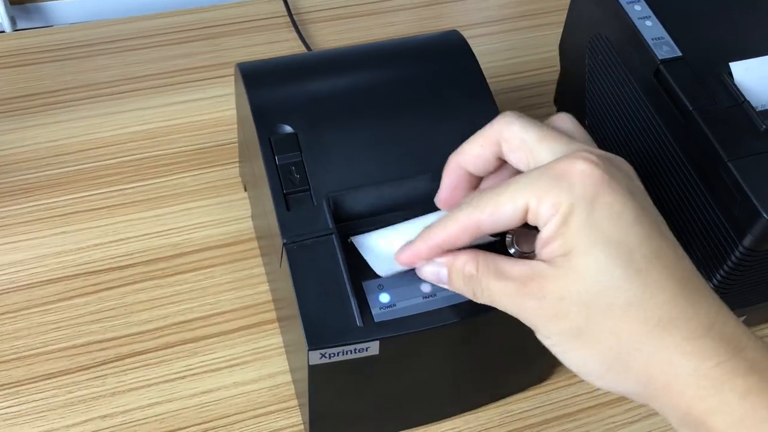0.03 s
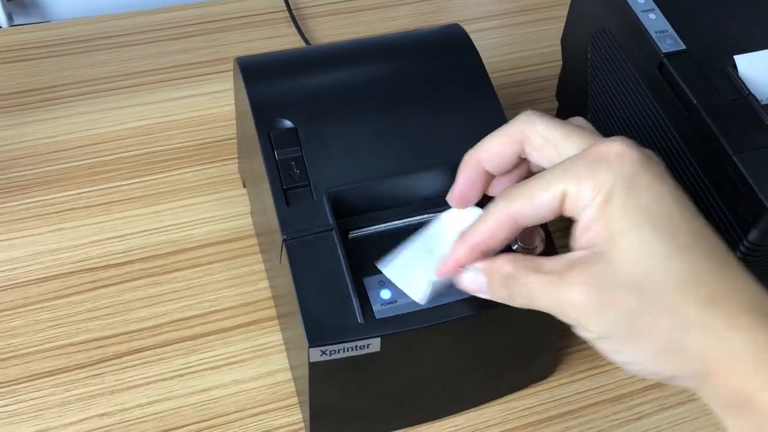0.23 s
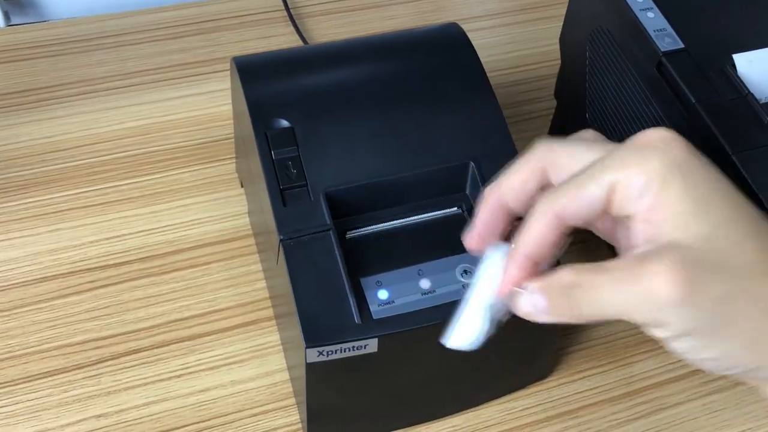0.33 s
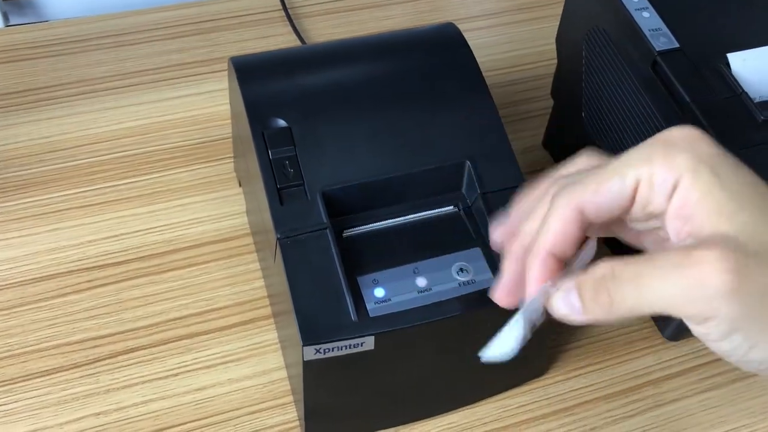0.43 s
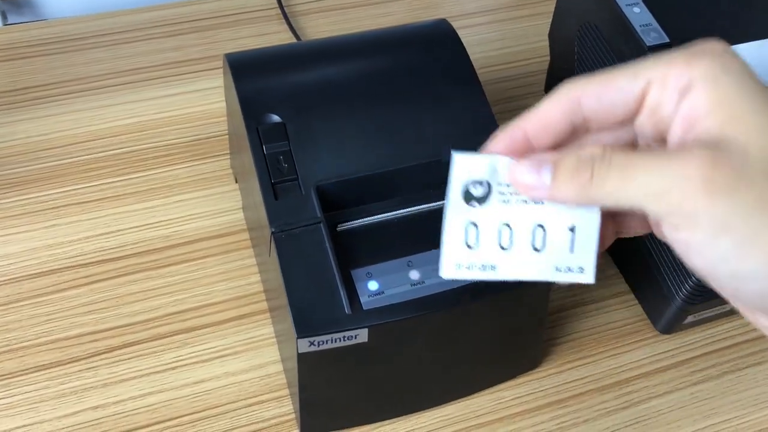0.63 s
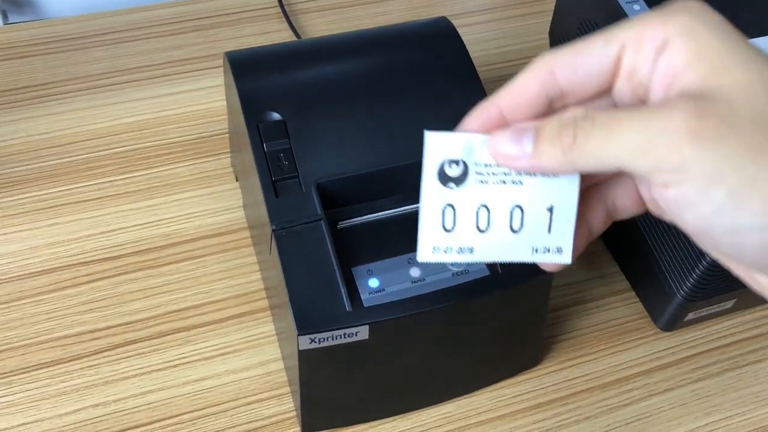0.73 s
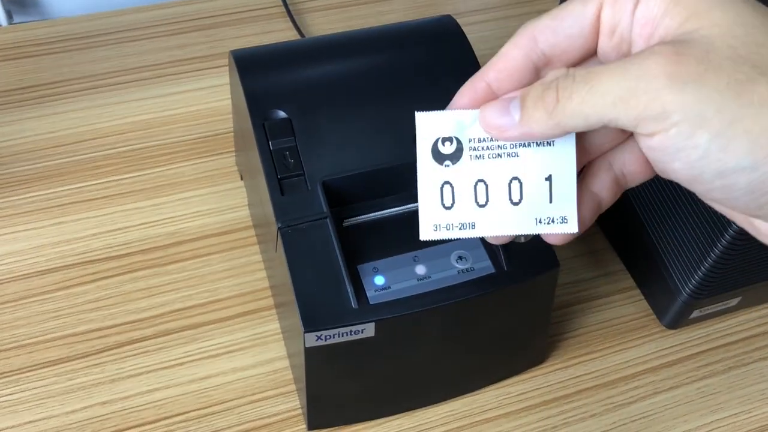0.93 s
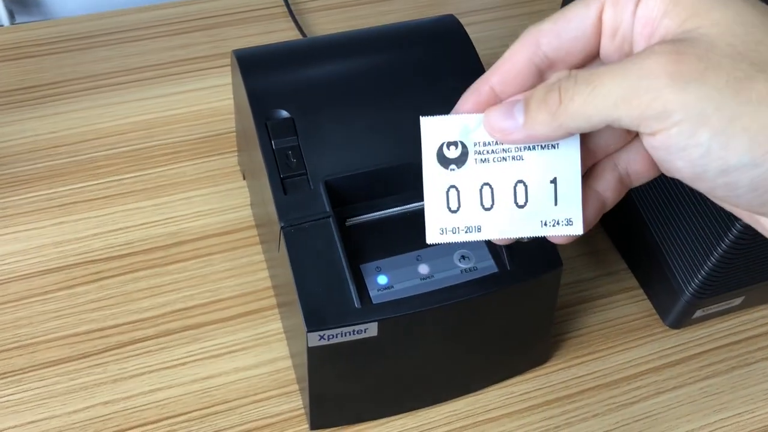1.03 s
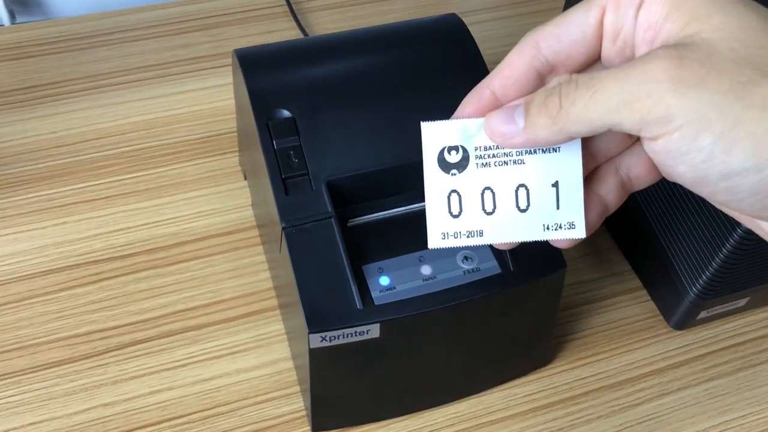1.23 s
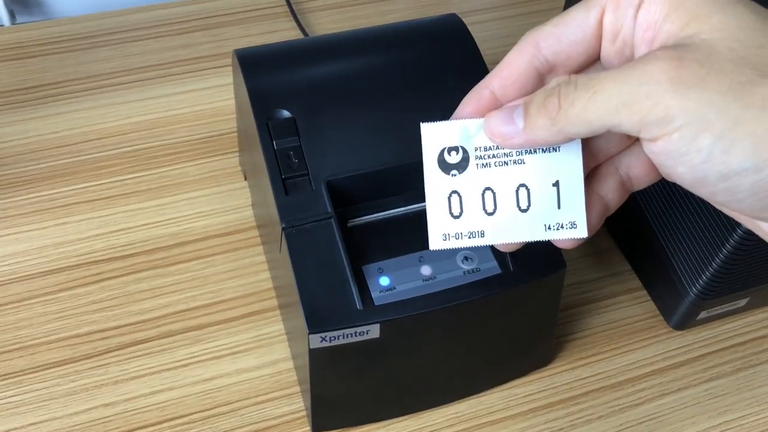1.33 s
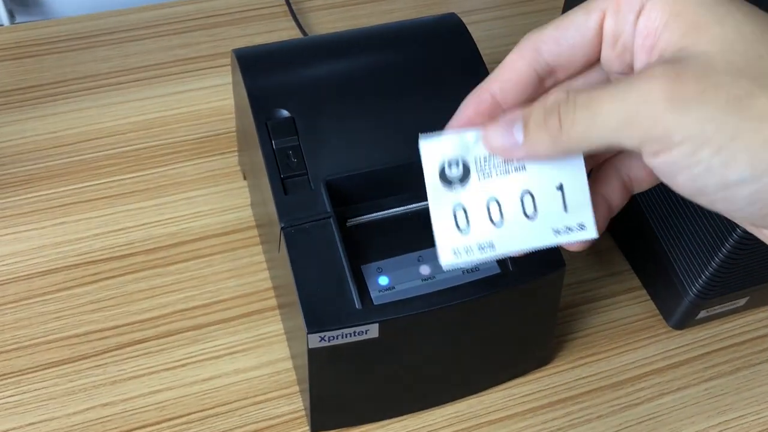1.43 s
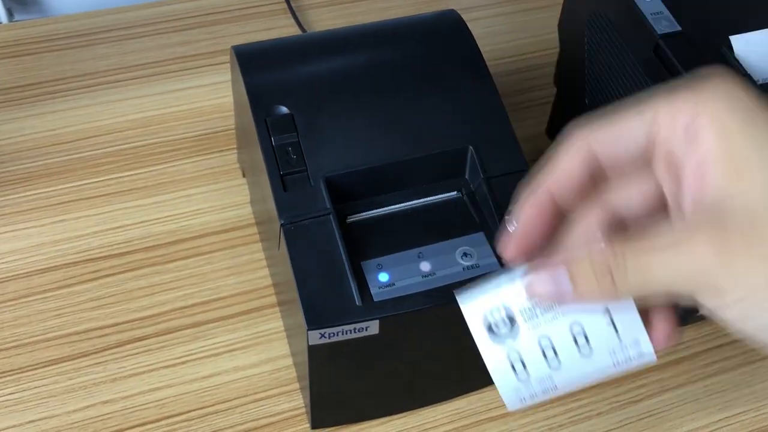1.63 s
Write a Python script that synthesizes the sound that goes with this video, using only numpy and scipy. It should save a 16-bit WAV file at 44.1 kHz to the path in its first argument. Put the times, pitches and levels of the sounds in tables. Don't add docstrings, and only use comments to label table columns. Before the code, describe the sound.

A small paper ticket is torn along a printer's toothed edge in a fast, crisp rip ending in a loud snap, then faint ticks and rustling between fingers, close to a phone in a quiet, lightly echoing office.

```python
import sys
import numpy as np
from scipy import signal
from scipy.fft import rfft, irfft
from scipy.io import wavfile
from scipy.ndimage import uniform_filter1d

SR = 44100
rng = np.random.default_rng(int(sys.argv[2]) if len(sys.argv) > 2 else 0)


def level_to_linear(level):
    exponent = np.asarray(level, float) / 20
    return 10 ** exponent


def to_wav(sig):
    pcm = np.clip(np.atleast_2d(sig), -1, 1) * 32767
    pcm = np.round(pcm).astype(np.int16)
    wavfile.write(sys.argv[1], SR, pcm.T)


N = 74970
T = np.arange(N) / SR

# f/Hz, density/dB
AIR_SPECTRUM = [(25, -28), (45, -5), (100, -6), (250, -14.5), (700, -14), (1800, -21), (3500, -31),
                (15000, -47.5)]
# f/Hz, width/Hz, level/dB
FAN_HUMS = [(44.7, 17, -65), (91.6, 32.6, -58.5), (188.8, 59.4, -54.5), (290.7, 95, -62.5)]
# f/Hz, T60/s
ROOM_T60 = [(300, 0.91), (1500, 1), (4000, 0.91), (8000, 0.45), (12000, 0.18), (16000, 0.44)]
# f/Hz, density/dB
SKIN_SPECTRUM = [(1500, -30.5), (2500, -12.5), (3300, 1.5), (4200, -5.5), (5600, -1), (7000, -3.5),
                 (9000, -4.5), (16000, -13.5)]
# f/Hz, width/Hz, level/dB, t favoured/s
SKIN_MODES = [(3330, 440, 1, 1.585), (5350, 600, -2, 1.655), (5600, 280, -1, 1.545), (6860, 350, 4, 1.6),
              (8060, 370, -3, 1.575), (10500, 350, 2, 1.545), (15230, 500, -3, 1.55)]
# f/Hz, width/Hz, level/dB
SLEEVE_MODES = [(5500, 2600, 0.5), (7160, 1700, 1), (10500, 2800, -0.5), (14500, 1000, -3),
                (15600, 600, -11.5)]
# t/s, level/dB
SLIDE_LEVEL = [(1.52, -74), (1.538, -53), (1.6, -54), (1.62, -59.5), (1.65, -54.5), (1.667, -54),
               (1.672, -63), (1.7, -67)]
# t/s, level/dB
RUSTLE_LEVEL = [(0, -69), (.15, -66), (.45, -53), (.58, -63.5), (.65, -58.5), (.69, -64), (.72, -63),
                (.8, -64), (.9, -73.5), (1.02, -73), (1.1, -67), (1.2, -70), (1.3, -78), (1.4, -69),
                (1.5, -67), (1.7, -72)]
# t/s, peak/dB, f/Hz, length/ms
TICKS = [
    (.5708, -40, 12280, .7),
    (.6193, -45, 8000, .7),
    (.7215, -50.5, 5500, 4.1),
    (1.6500, -46.5, 5300, 12),
    (1.6600, -50, 10930, 2.4),
    (1.6610, -52, 14500, 2.5),
]
# t/s, peak/dB, f/Hz, decay/ms
KNOCKS = [(.1585, -44.5, 4300, 2.5), (0.189, -40, 1530, 3.8), (.2011, -15, 11500, .15),
          (.3562, -11, 9500, .2), (.3600, -14, 11000, .2), (.3707, -8, 7500, .15), (.3723, -7, 9500, 0.17),
          (.2020, -36, 472, 4.3), (0.201, -38, 1300, 3.4), (.2185, -31, 650, 5.7), (.2385, -35, 700, 5.3),
          (.2830, -33, 690, 6), (.2190, -37.5, 1795, 5), (0.2198, -44, 1480, 5), (.2385, -31, 552, 7.5),
          (0.24, -33, 1290, 4.4), (.2390, -36.5, 2150, 5), (.3735, -29.5, 2050, 2.6),
          (.3750, -26.5, 1705, 4.6), (.3750, -29, 1226, 4), (.5715, -37.5, 3650, 1.3),
          (0.572, -52, 3000, 0.74), (.5716, -49, 4750, .8), (0.572, -46, 7000, 0.81),
          (.5720, -42, 1240, 1.9), (.6193, -38.5, 3550, 1.74), (.6194, -48, 5800, 1.5),
          (.6197, -41.5, 2650, 1.4), (0.621, -39, 1500, 1.5), (.6205, -40.5, 2100, 1.5),
          (.6222, -37, 2000, .4), (0.623, -38, 3600, 0.88), (1.6439, -48, 900, 0.51)]
# f/Hz, density/dB
FIBRE_SPECTRUM = [(700, -21.5), (1150, -9), (1700, -11.5), (3000, -12.5), (4930, -13), (7930, -15),
                  (12100, -12.5), (16000, -22.5)]
# t/s, peak/dB, f/Hz, length/ms
CATCHES = [(.1368, -45.5, 10000, 4.3), (.1430, -43, 6520, 4), (.1530, -39.5, 11020, 3.0),
           (.1572, -36, 10500, 2.9), (.1582, -50, 4284, 2.7), (.1712, -52, 11540, 0.87),
           (.1762, -43, 13000, 1.3), (.1857, -24, 14100, 1.1), (.1913, -25.5, 11030, 2.9),
           (.1970, -32.5, 11000, 2.5), (.1925, -36, 5500, 1.5), (.2010, -16, 12000, 0.8),
           (.2022, -21.5, 11500, 2.2), (.2051, -18.5, 12500, 1.5), (.2106, -22, 11500, 0.5),
           (.2141, -18, 12200, 1.2), (.2151, -12.5, 12200, 1.6), (.2165, -26.5, 6930, 2),
           (.2198, -24, 12470, 1.8), (.2351, -18.5, 12200, 1.3), (.2385, -24, 12000, 1.2),
           (.2396, -15.5, 12000, 1.8), (.2405, -26, 6200, 2), (.2441, -17.5, 12600, 1.3),
           (.2489, -22, 13500, 5.2), (.2511, -19.5, 7430, 2.5), (.2545, -27, 11500, 2.5),
           (.2578, -24.5, 13000, 2.0), (.2610, -26, 11500, 2.0)]
# t/s, peak/dB, f/Hz, length/ms
TEETH = [(0.2662, -21, 12520, 3.1), (.2698, -20.5, 11000, 1.3), (0.2732, -19.5, 11500, 1.6),
         (0.2768, -20.5, 11450, 1.1), (.2805, -18, 13000, 1.8), (.2852, -19, 11470, 2.64),
         (.2877, -18, 9700, 1.9), (.2912, -24.5, 9000, 1.8), (.2942, -20.5, 6520, 1.6),
         (0.2992, -17.5, 12620, 1.8), (0.3050, -15, 11470, 2.0), (.3060, -22, 6160, 0.77),
         (0.3105, -20.5, 5000, 2.7), (.3140, -24, 10040, 2), (0.3180, -18, 8290, 1.5),
         (.3215, -19.5, 10000, 3.9), (.3250, -20.5, 5000, 4.1), (0.3305, -19, 5000, 1.6),
         (.3335, -15, 8520, 1.1), (0.3365, -16, 10500, 2.5), (.3375, -19, 4800, 3.6),
         (.3410, -13.5, 10000, 3), (0.3458, -17.5, 4700, 3.5), (0.3521, -12.5, 11000, 2.9),
         (0.3560, -10.5, 9480, 1.4), (0.3598, -12, 10970, 1.3), (0.3615, -13.5, 7000, 3.3),
         (.3695, -18.5, 8990, 1), (0.3707, -8, 8040, 0.8), (.3712, -11, 12000, 1.4),
         (0.3720, -5, 10130, 1.6), (0.3738, -11, 8500, 2.4), (0.3756, -18.5, 5300, 2.5),
         (0.3775, -22, 2203, 4.3)]
# t/s, level/dB
PULL_LEVEL = [(.15, -65), (.18, -63.5), (.215, -39), (.23, -51), (.245, -36), (.33, -31), (.361, -31),
              (.365, -49), (.38, -42.5)]
# t/s, level/dB
STRAIN_LEVEL = [(.19, -51), (.218, -37.5), (.232, -45.5), (.25, -38), (.27, -42), (.3, -36), (.36, -38.5),
                (.375, -45.5), (.52, -62.5)]
# f/Hz, width/Hz, level/dB
SHEET_MODES = [(4000, 1100, -4), (5000, 1200, -8), (6760, 780, -5), (9220, 250, -1.5), (11100, 700, -14),
               (12200, 930, -6), (14900, 1200, 1)]
# f/Hz, width/Hz, level/dB, t at which tear passes their most sensitive spot/s
CASE_MODES = [(300, 55, -11, 0.34), (399.5, 89, -12, 0.33), (477.3, 65, -3, .29), (564, 71, -4, 0.25),
              (646.3, 40, -6, 0.31), (712, 18, -3, 0.345), (824, 110, -8, 0.26), (1168.3, 30, 0, 0.285),
              (1146.6, 30, -0.5, 0.36), (1568, 50, -6.5, 0.355), (1743, 50, -8.5, 0.23),
              (2150, 82, -10, .245), (2756, 36, -6.5, .34)]

SNAP_DB, ATTACK_S, BURST_END_S = 1.44, .0002, .03
CRACK_DB, CRACK_S = 7.5, .00015
TEAR_Q, TICK_Q = 1.5, 4.8
CATCH_WIDE_DB, TEETH_WIDE_DB, TICK_WIDE_DB = -3, -0.5, -8
HISS_SNAP_DB, FLICKER_DB = 2.5, 1.5
GATE_S, GATE_POWER = .0022, .37
SHEET_DB, CASE_DB, CASE_WANDER_DB = -0.5, 7.5, 2
SPOT_S, SPOT_DB, STEADY_S = .017, 8, .02
SKIN_RING_DB, SKIN_SPOT_S, SKIN_SPOT_DB = -7, .0295, 7
AIR_DB = -53.5
ROOM_DB, ROOM_GAP_S, ROOM_EVEN_S = -18, .0018, .013


def unit(x):
    return x / np.sqrt(np.mean(x ** 2))


def curve(rows):
    s, db = np.array(rows).T
    return level_to_linear(np.interp(T, s, db, left=-120, right=-120))


def colour(x, points):
    hz, db = np.array(points).T
    f = np.fft.rfftfreq(len(x), 1 / SR) + 1
    gain = level_to_linear(np.interp(np.log(f), np.log(hz), db, left=-60))
    return irfft(rfft(x) * gain, len(x))


def ring(x, hz, width_hz):
    b, a = signal.iirpeak(min(hz, .42 * SR), max(hz / width_hz, .3), fs=SR)
    return signal.lfilter(b, a, x)


def walk(rate_hz):
    k = int(SR / rate_hz)
    steps = np.repeat(rng.standard_normal(N // k + 1), k)
    return 1.3 * uniform_filter1d(uniform_filter1d(steps, k), k)[:N]


def crackle(size, snap_db):
    return unit(rng.standard_normal(size) * level_to_linear(snap_db * rng.exponential(size=size)))


def bursts(rows, wide_db, q):
    out, t = np.zeros(N), T[:2048]
    for s, db, hz, ms in rows:
        fade = np.exp(-(t / (max(ms, .3) / 1000)) ** 1.11)
        crack = level_to_linear(CRACK_DB) * np.exp(-t / CRACK_S) / 2
        snaps = crackle(len(t), SNAP_DB) * (1 - np.exp(-t / ATTACK_S)) * (fade + crack)
        pitched = ring(ring(snaps, hz, hz / q), hz, hz / q)
        burst = unit(pitched) + level_to_linear(wide_db) * unit(colour(snaps, FIBRE_SPECTRUM))
        burst = burst * (t < BURST_END_S)
        level = level_to_linear(db) * 0.34 * np.sqrt(ms / 59.0)
        i = int(s * SR)
        out[i:i + len(t)] += (level * unit(burst))[:N - i]
    return out


def office():
    sway = level_to_linear(.6 * walk(5))
    out = unit(colour(rng.standard_normal(N), AIR_SPECTRUM)) * level_to_linear(AIR_DB) * sway
    for hz, width_hz, db in FAN_HUMS:
        hum = ring(ring(rng.standard_normal(N), hz, width_hz), hz, 1.3 * width_hz)
        out = out + level_to_linear(db) * unit(hum)
    return out


def room(x):
    hz, t60_s = np.array(ROOM_T60).T
    t, tail, noise = T[:SR], 0, rfft(rng.standard_normal(SR))
    place = 4 * np.log2((np.arange(len(noise)) + 1) / 250)
    for k in range(25):
        band = irfft(noise * np.cos(np.pi / 2 * np.clip(place - k, -1, 1)) ** 2, SR)
        envelope = np.sqrt(uniform_filter1d(band ** 2, int(ROOM_EVEN_S * SR)))
        band = band * np.std(band) / envelope
        band_t60_s = np.interp(np.log(250 * 2 ** (k / 4)), np.log(hz), t60_s)
        tail = tail + band * level_to_linear(-60 * t / band_t60_s)
    tail = tail * np.clip(t / ROOM_GAP_S - 1, 0, 1)
    return signal.fftconvolve(x, tail / np.sqrt(np.sum(tail ** 2)))[:N]


def slide():
    rub = crackle(N, 1.3)
    modes = 0
    for hz, width_hz, db, s in SKIN_MODES:
        spot_db = SKIN_SPOT_DB * np.exp(-((T - s) / SKIN_SPOT_S) ** 2)
        modes = modes + level_to_linear(db + spot_db) * ring(rub, hz, width_hz)
    skin = unit(colour(rub, SKIN_SPECTRUM)) + level_to_linear(SKIN_RING_DB) * unit(modes)
    return unit(skin) * curve(SLIDE_LEVEL) * level_to_linear(0.99 * walk(59.9))


def rustle():
    cloth = crackle(N, 2.4)
    modes = 0
    for hz, width_hz, db in SLEEVE_MODES:
        modes = modes + level_to_linear(db + 2.7 * walk(5.4)) * ring(cloth, hz, width_hz)
    mix = unit(.5 * unit(colour(cloth, SKIN_SPECTRUM)) + unit(modes))
    return mix * curve(RUSTLE_LEVEL) * level_to_linear(.8 * walk(30))


def fingers():
    return slide() + rustle() + bursts(TICKS, TICK_WIDE_DB, TICK_Q)


def knocks():
    s, db, hz, ms = np.array(KNOCKS).T[:, :, None]
    t = np.clip(T - s, 0, None)
    return np.sum(level_to_linear(db) * np.sin(2 * np.pi * hz * t) * np.exp(-t / ms * 1000), axis=0)


def case():
    out = 0
    for hz, width_hz, db, s in CASE_MODES:
        spot_db = SPOT_DB * (np.exp(-((T - s) / SPOT_S) ** 2) - 1)
        drive_db = CASE_DB + db + spot_db + CASE_WANDER_DB * walk(40)
        mode = ring(crackle(N, SNAP_DB), hz, width_hz)
        mode = mode / np.sqrt(uniform_filter1d(mode ** 2, int(STEADY_S * SR)) + 1e-9)
        out = out + ring(mode * curve(STRAIN_LEVEL) * level_to_linear(drive_db), hz, width_hz) * 0.66
    return out


def tear():
    hiss = unit(colour(crackle(N, HISS_SNAP_DB), FIBRE_SPECTRUM))
    hiss = hiss * curve(PULL_LEVEL) * level_to_linear(FLICKER_DB * walk(250))
    rips = bursts(CATCHES, CATCH_WIDE_DB, TEAR_Q) + bursts(TEETH, TEETH_WIDE_DB, TEAR_Q)
    quick = uniform_filter1d(np.abs(rips), int(GATE_S * SR)) + 1e-4
    slow = uniform_filter1d(quick, int(10 * GATE_S * SR))
    paper = rips + hiss * (quick / slow) ** GATE_POWER
    sheet = sum(level_to_linear(db + SHEET_DB) * ring(paper, hz, width_hz) for hz, width_hz, db in SHEET_MODES)
    return 0.9 * paper + sheet + case()


def scene():
    near = tear() + fingers() + knocks()
    return (near + level_to_linear(ROOM_DB) * room(near) + office())[None, :]


def low_pass(x):
    return signal.sosfilt(signal.butter(12, 16980, fs=SR, output="sos"), x)


def record(dry):
    knee = .75
    bass_cut = signal.butter(4, 36, "high", fs=SR, output="sos")
    top_cut = signal.ellip(10, .3, 60, 15900, fs=SR, output="sos")
    mix = signal.sosfilt(bass_cut, dry)
    mix = knee * np.tanh(mix / knee)
    mix = signal.sosfilt(top_cut, mix)
    return low_pass(mix)


dry = scene()
out = record(dry)
to_wav(out)
```